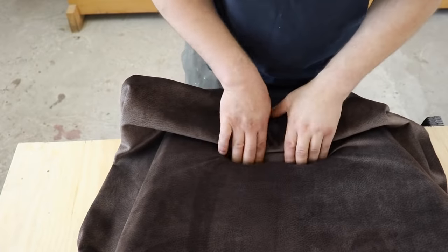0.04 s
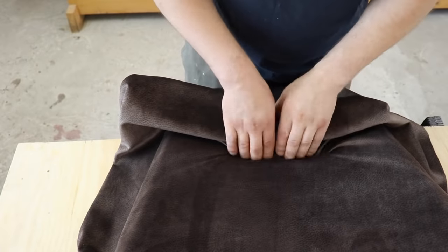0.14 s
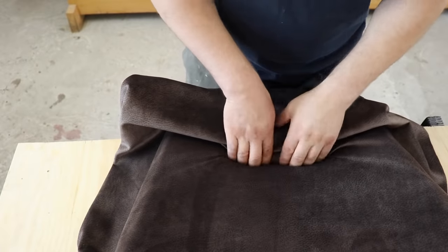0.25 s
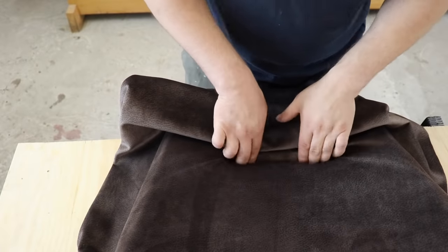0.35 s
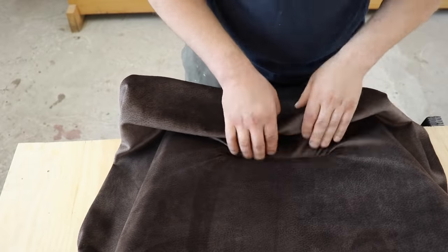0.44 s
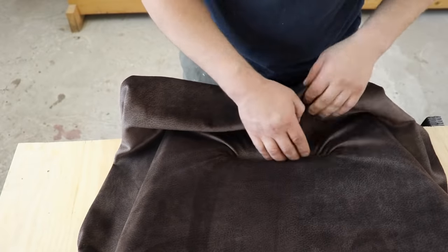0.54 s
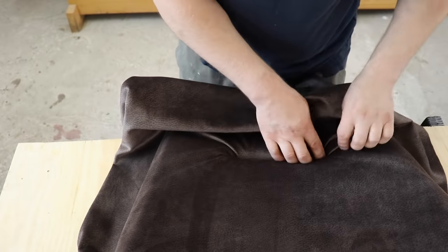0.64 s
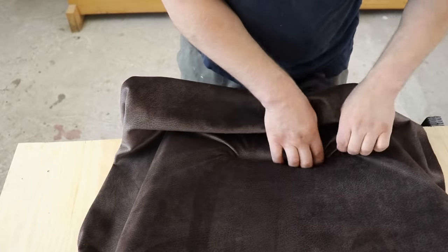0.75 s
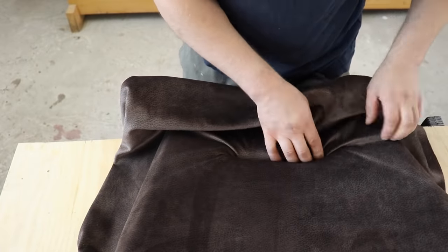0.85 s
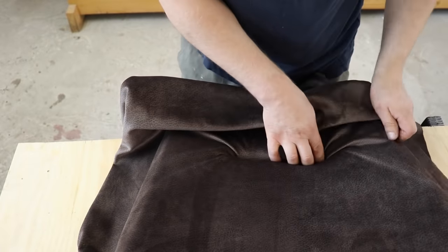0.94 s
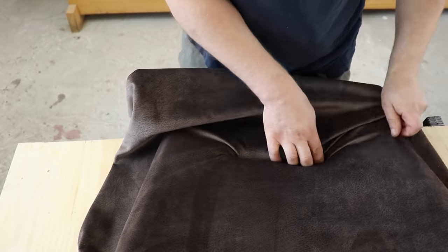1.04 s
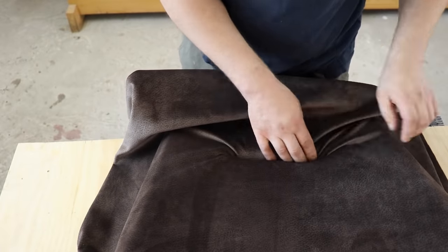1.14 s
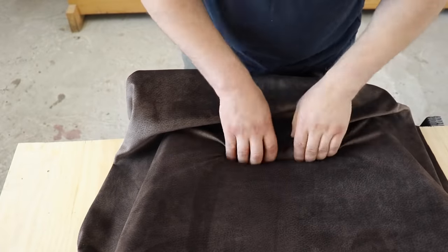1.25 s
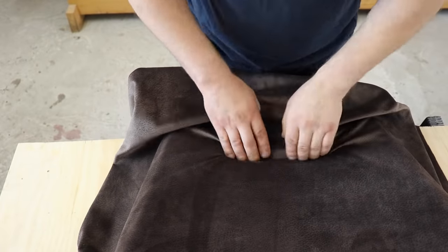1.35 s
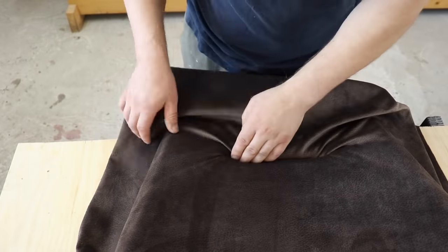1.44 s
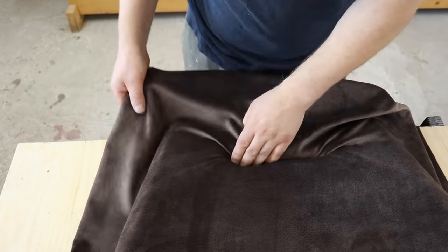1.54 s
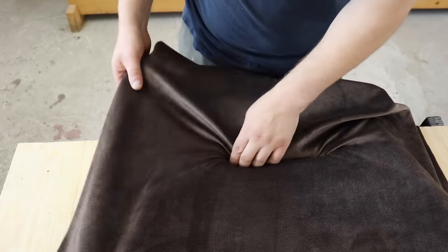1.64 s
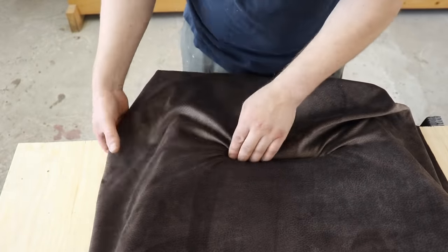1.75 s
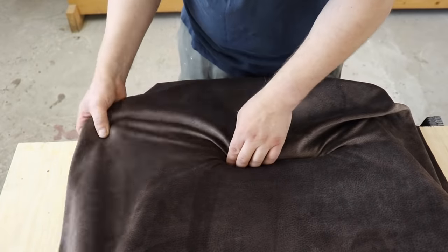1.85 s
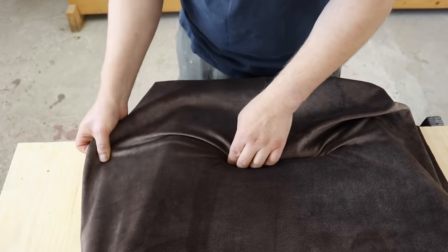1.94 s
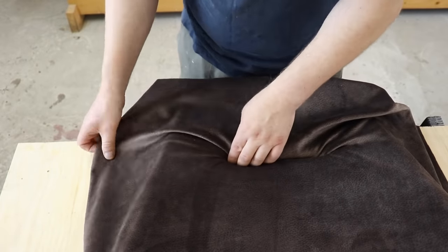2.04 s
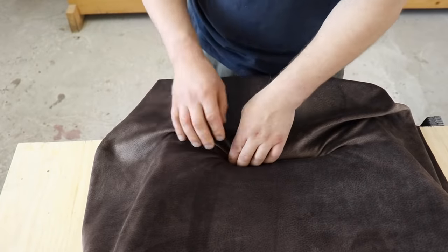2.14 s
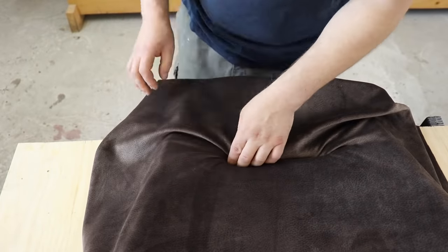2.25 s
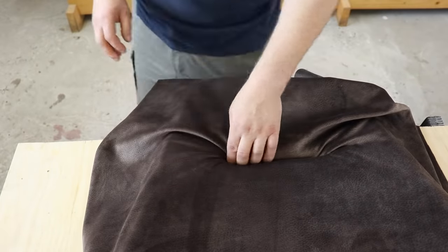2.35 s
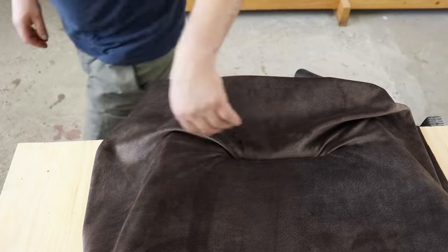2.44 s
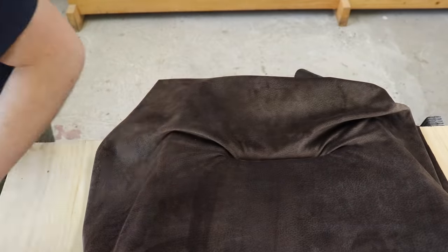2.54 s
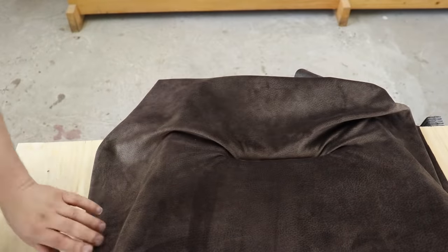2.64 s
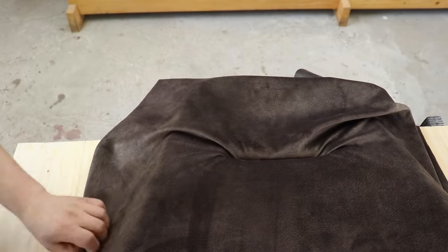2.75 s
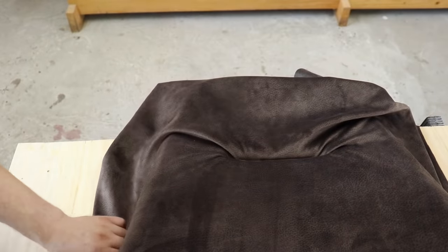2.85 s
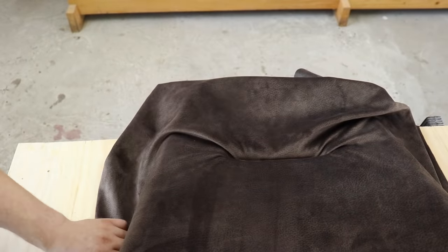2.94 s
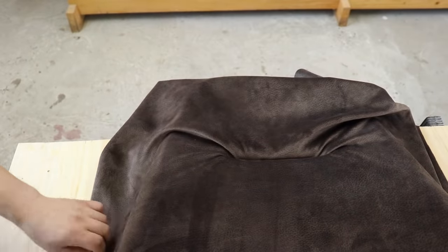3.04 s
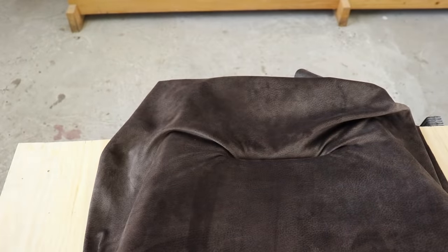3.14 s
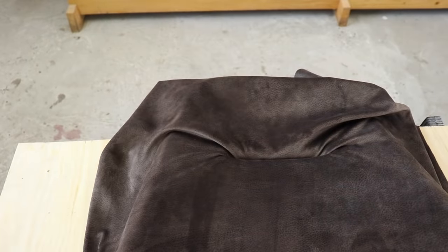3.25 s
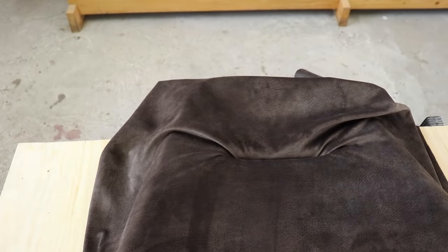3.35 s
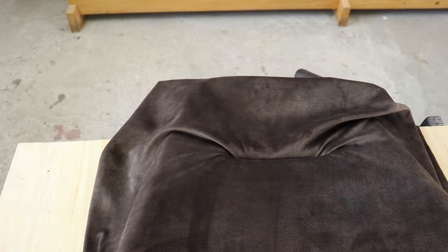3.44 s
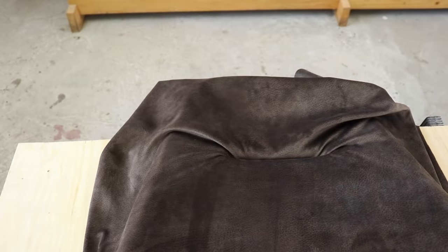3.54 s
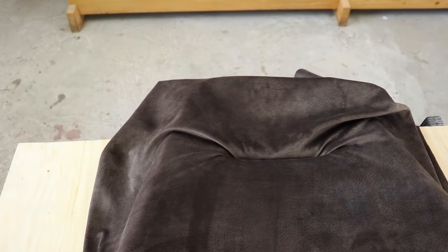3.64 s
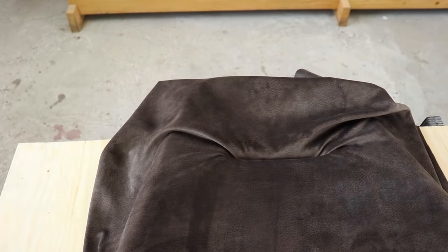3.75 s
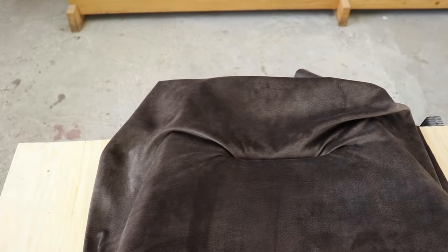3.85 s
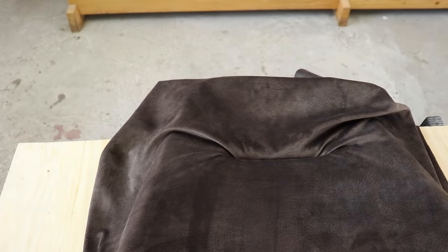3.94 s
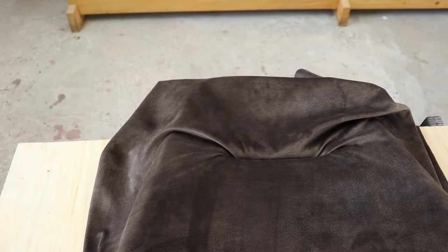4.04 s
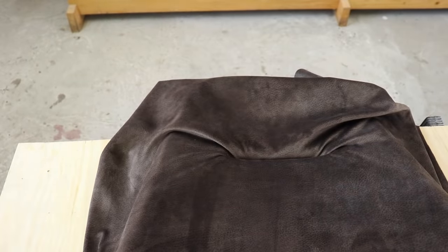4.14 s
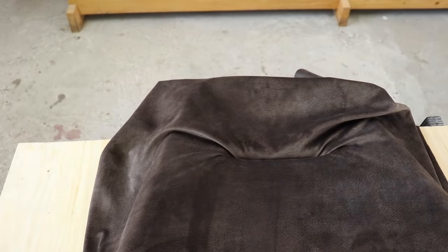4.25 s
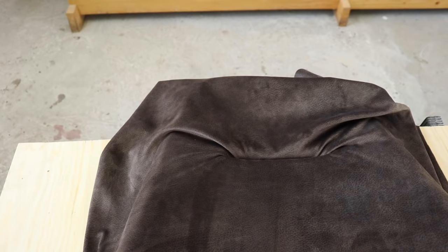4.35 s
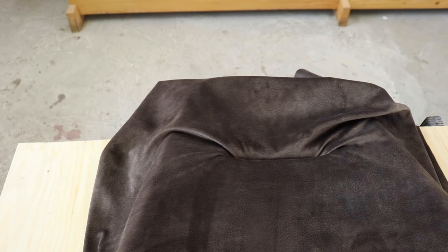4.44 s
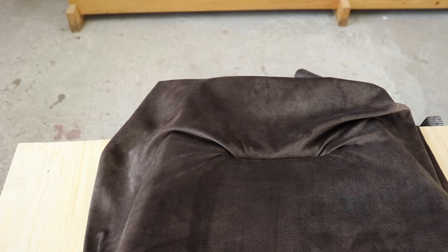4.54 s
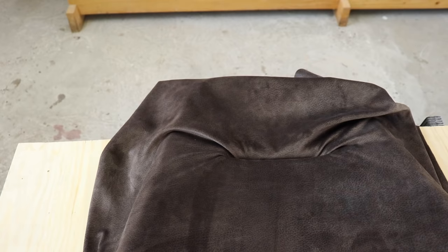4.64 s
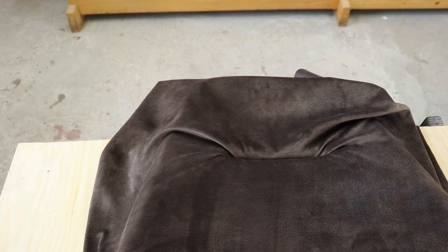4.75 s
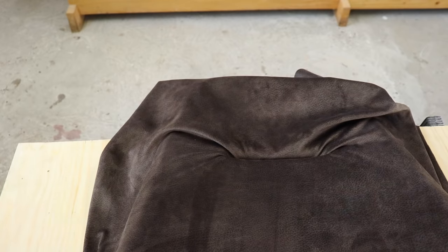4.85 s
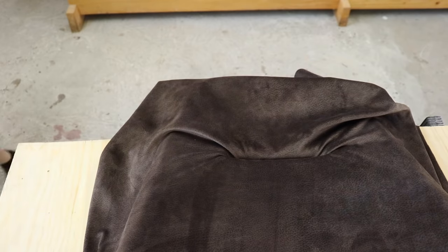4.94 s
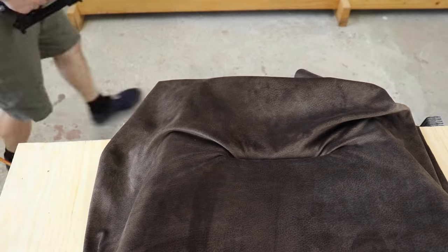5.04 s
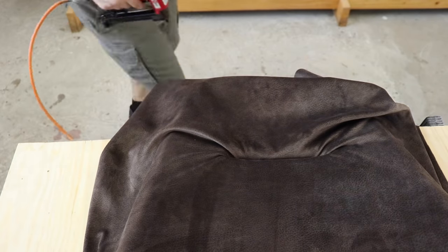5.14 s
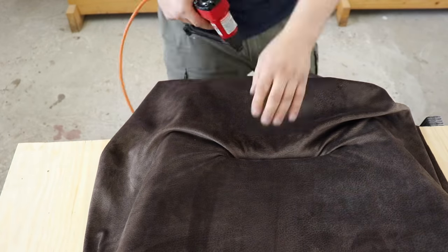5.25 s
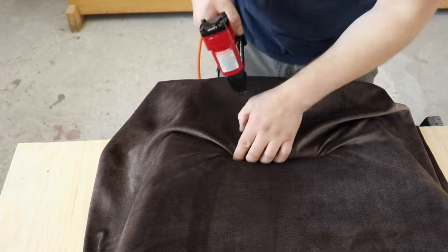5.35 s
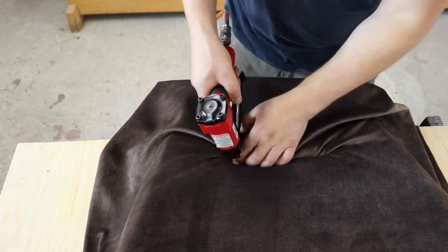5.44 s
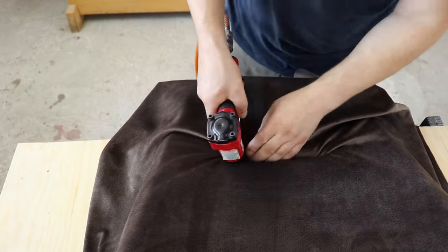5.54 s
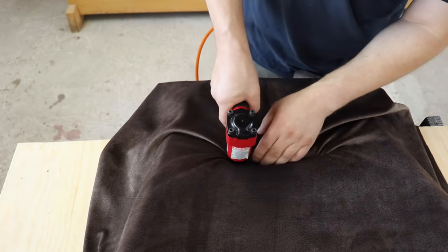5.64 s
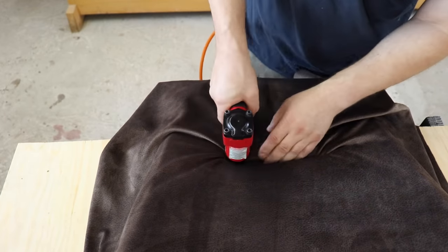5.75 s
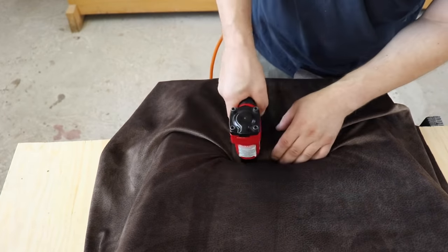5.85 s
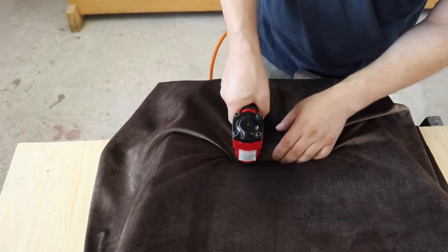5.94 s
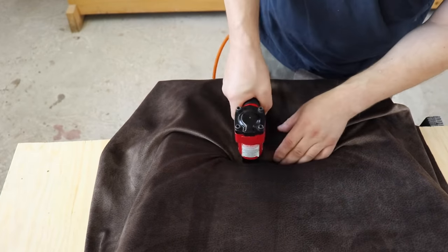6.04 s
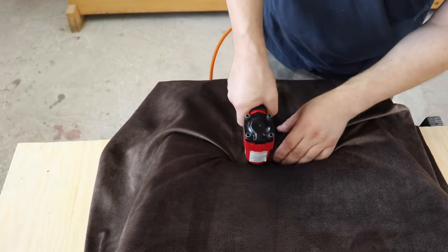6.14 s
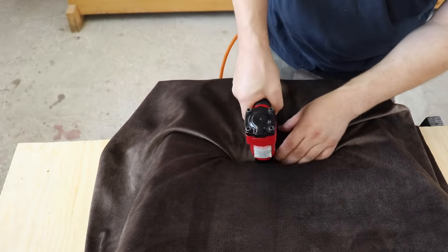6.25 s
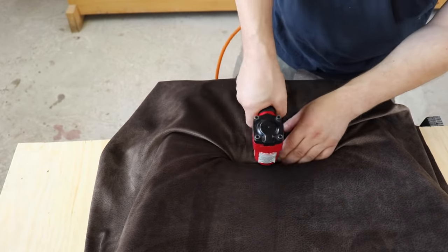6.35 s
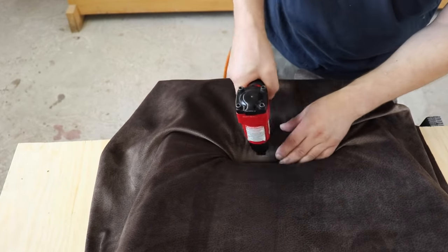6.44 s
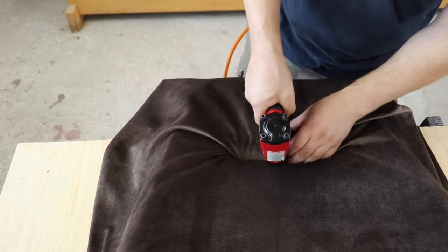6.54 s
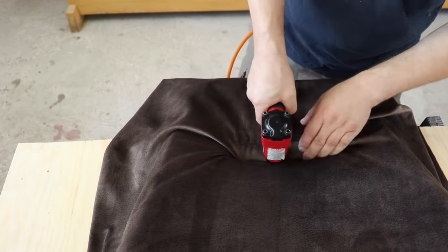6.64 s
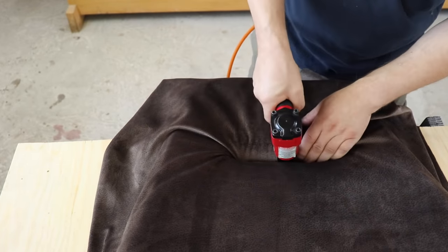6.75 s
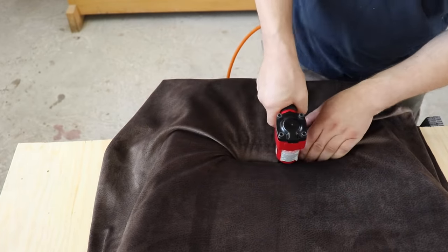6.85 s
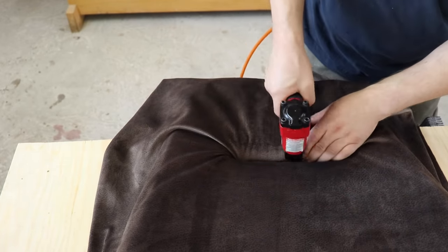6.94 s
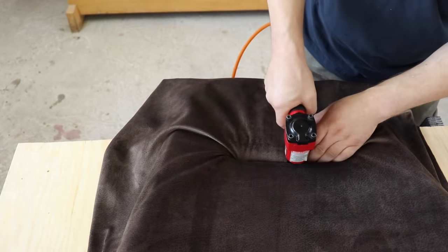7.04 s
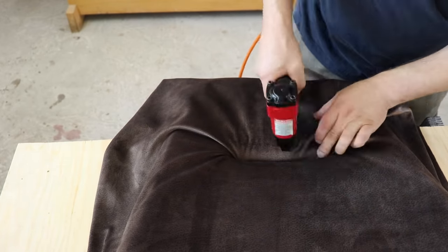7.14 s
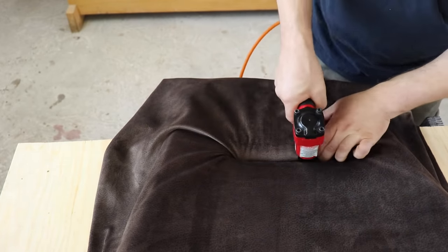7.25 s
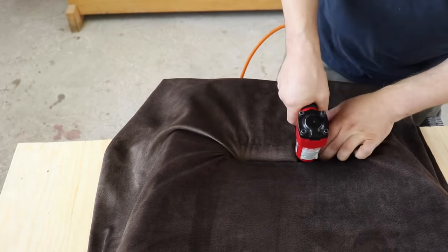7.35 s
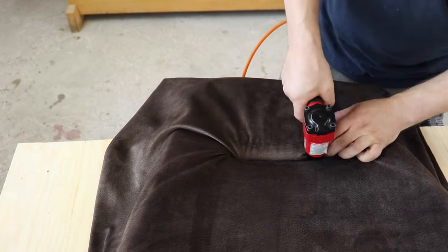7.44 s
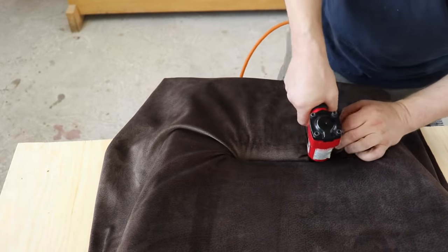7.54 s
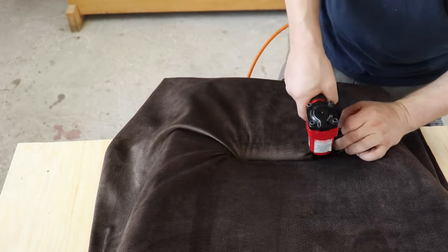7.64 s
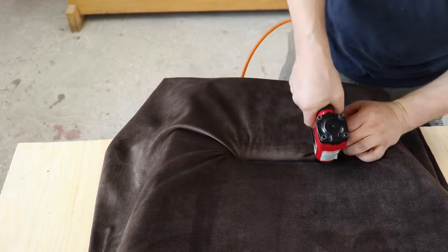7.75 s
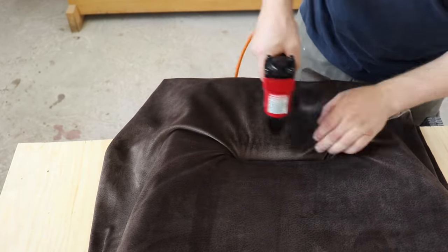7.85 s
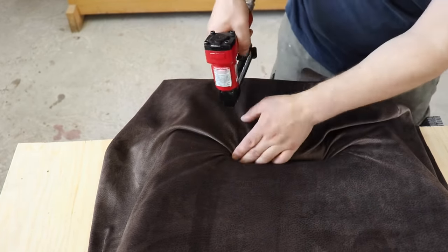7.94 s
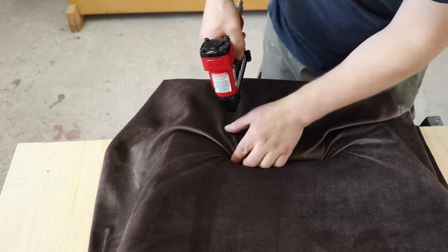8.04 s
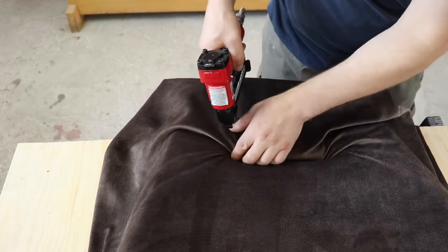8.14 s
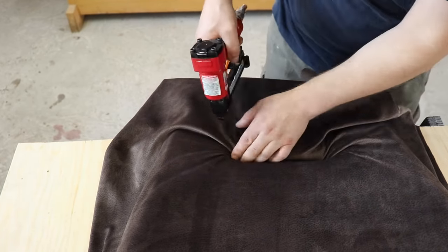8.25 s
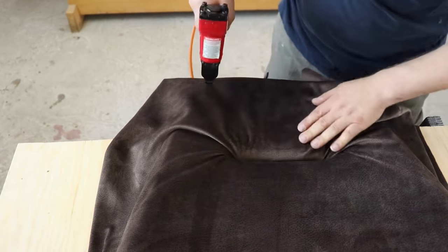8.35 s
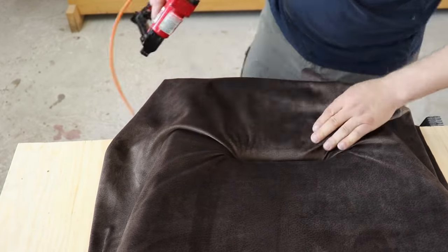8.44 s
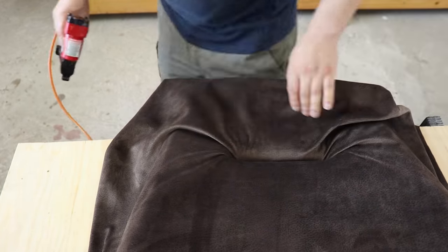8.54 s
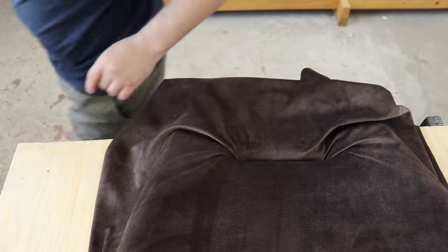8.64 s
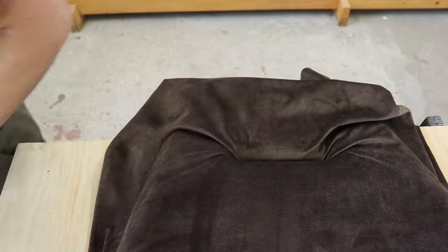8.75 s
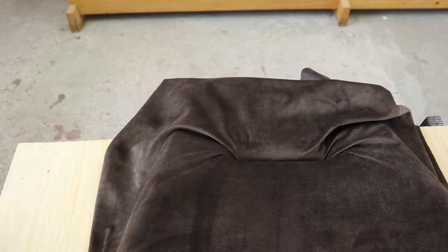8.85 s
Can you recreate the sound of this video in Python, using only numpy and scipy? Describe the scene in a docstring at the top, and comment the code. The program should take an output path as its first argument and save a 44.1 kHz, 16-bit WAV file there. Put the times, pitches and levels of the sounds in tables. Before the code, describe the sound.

Soft fabric handling and a hard double clank over a steady machine hum, followed by a brisk, overloaded run of ten pneumatic staple shots.

```python
"""An air stapler fires ten staples through cloth into plywood in a hard-walled workshop.
Each shot is direct ringing of nose, piston and board, with bands of noise for air, valve and room.
Before and after the shots, cloth rustles and things are handled: short noise rubs, clicks and wood knocks.
A far machine drones throughout as shaped noise, narrow whistles and thin tones.
The stereo recorder overloads on the blows, and its late limiter lets go at a steady rate."""
import sys
import numpy as np
from scipy import signal
from scipy.io import wavfile

SR = 44100
rng = np.random.default_rng(int(sys.argv[2]) if len(sys.argv) > 2 else 0)


def inscribe(sig):
    """Save sig as 16-bit PCM at rate SR to the path in sys.argv[1].

    A 1-D sig is mono; a 2-D sig holds one channel per row.
    Samples are clipped to [-1, 1] before scaling.
    """
    pcm = np.round(np.clip(np.atleast_2d(sig).T, -1, 1) * 32767)
    wavfile.write(sys.argv[1], SR, pcm.astype(np.int16))


N = 392490
STEP = 8   # samples between the points of a power envelope
CUTOFF_HZ = 15900   # top of the recorder's range
DRONE_DB = -43   # relative level of the drone's noise
LEFT_DB = 2   # band noise (but the clank's), thin tones and squeaks are this much louder on the left
VALVE_LEAD_S = 0.00579   # the valve opens this long before the driver lands
RUB_S, BELOW_DB_PER_OCT, ABOVE_DB_PER_OCT = 0.0065, 6, 5   # rub length; fall either side of its strongest pitch
TICK_DB, TICK_T60_S = -10.5, 0.012   # a crack also rings briefly at its strongest pitch
SWELL_S = 0.00071   # time constant of the rounded start of room sound
LEAN_DB = LEFT_DB / 2 * np.array([[1], [-1]])   # left row, right row

# All table levels are relative; the functions add each source's offset.
# Far machine, broad noise. Each row: pitch in Hz, level in dB per Hz.
DRONE_SPECTRUM = [(24, -86), (40, -48), (223, -7.5), (435, -20), (467, -3), (566, -13), (956, -5.5),
                  (1100, -6), (1430, -2), (1660, -3), (2310, -3.5), (3150, -7.5), (12000, -22.5),
                  (15600, -58), (22000, -120)]
# Far machine, narrow whistles. Each row: pitch in Hz, width in Hz, level in dB.
DRONE_WHISTLES = [(660, 31, -8.5), (979.5, 35, -3), (1426, 20, -3), (1797, 29, -1), (1992, 27, 0.5),
                  (2221, 29, 0.5), (3344, 38, -6.5), (3770, 23, -18.5), (3965, 6.5, -0.5),
                  (4390, 59, -10.5), (5070, 110, -18.5), (6370, 17, -14)]
# Far machine, thin tones. Each row: pitch in Hz, level in dB rms.
DRONE_TONES = [(958.2, -66.5), (1389, -64.5), (1798, -64), (1970, -77.5), (2256, -65.5), (2390, -75),
               (3774, -70), (3930, -67), (4587, -76), (4748, -75.5), (5254, -83.5), (6347, -72)]
# Cloth and sleeves rustling. Each row: time in seconds, level in dB.
RUSTLE_LEVEL = [(0.0, -55), (0.32, -63), (1.05, -64), (1.3, -60.5), (2.41, -63), (2.75, -52), (2.9, -69),
                (3.33, -55.5), (4.0, -63), (4.33, -56.5), (4.64, -48), (4.8, -43.5), (5.09, -54.5),
                (5.47, -51), (5.78, -82), (8.05, -61), (8.39, -59), (8.9, -53.5)]
# Colour of the cloth. Each row: pitch in Hz, level in dB per Hz.
RUSTLE_SPECTRUM = [(300, -18), (2000, -2), (4500, -2), (7500, 1.5), (11000, -7), (16000, -2)]
# Faint squeaks and whines. Each row: start in seconds, length in seconds, pitch in Hz, level in dB.
SQUEAKS = [(0.185, 0.059, 2890, -52), (1.701, 0.063, 3880, -54), (3.287, 0.078, 3750, -51),
           (3.302, .06, 4950, -60), (3.471, 0.041, 6530, -48.5), (3.64, 0.079, 2470, -50.5),
           (4.239, 0.044, 2540, -48), (4.529, 0.028, 2550, -47.5), (8.0, .85, 1203, -57)]
# Scuffs, cloth snaps and small bumps. Each row: start in seconds, level in dB at the strongest pitch,
# that pitch in octaves above 1 kHz, first crack in dB relative to that level.
HANDLING = [(1.61, -42.5, 3.4, 3), (1.719, -44, 1.6, 1), (2.151, -42, 1.9, 1), (2.325, -49.5, 3.3, 4),
            (2.589, -45, 3.1, 0), (2.715, -33.5, 2.84, 1.5), (2.789, -41.5, 3.4, -1),
            (2.886, -37.5, 2.83, 5.5), (3.127, -49, 2.8, 3), (3.201, -44, 2.3, 2), (3.473, -41, 1.9, -2),
            (3.584, -33, 1.57, -8), (3.718, -35.5, 1, -7), (3.843, -35, 1.1, -8), (4.184, -38.5, 2.7, -7),
            (4.226, -33.5, 3.4, 5.5), (4.269, -40.5, 3.3, 0), (4.341, -22.5, 3.88, 2),
            (4.498, -40, 1.1, -6), (4.605, -37.5, 1.86, -1), (4.95, -36, 2.7, -5), (5.035, -37.5, 2.4, 2),
            (5.051, -39.5, 2.8, 12), (5.1297, -40.5, 1, 15.5), (5.261, -33, 1.5, 0), (5.297, -45, 2.6, 10),
            (5.316, -44.5, 2.8, 13), (5.37, -25.5, 1.03, 2), (5.448, -44, 3.1, -1),
            (8.0927, -49, 0.97, 10.5), (8.427, -36.5, 2.05, -2), (8.526, -49, 3, 3),
            (8.584, -45.5, 2.1, 4.5), (8.873, -37.5, 1.04, 4.5)]
# Slight bass trim of the small sounds. Each row: pitch in Hz, change in dB.
RUB_BASS = [(120, -1), (670, -0.5)]
# Hollow knocks on wood. Each row: start in seconds, peak level in dB, base pitch in Hz.
KNOCKS = [(1.644, -51, 620), (1.894, -50, 680), (2.177, -51, 654), (5.131, -40.5, 475), (5.375, -29.5, 655),
          (7.392, -47, 407), (8.095, -42.5, 900), (8.433, -41.5, 880)]
# Overtones of every wood knock. Each row: multiple of the base pitch, level in dB, t60 in seconds.
WOOD_OVERTONES = [(1.0, 1.5, .07), (1.17, -3, .05), (2.25, 0, 0.051), (3.4, -15, 0.042), (4.8, -42, 0.016)]
# Tool knocked against the bench. Each row: start in seconds, level in dB, brightness in dB, which
# shifts the noise's treble (from 3.5 kHz, full at 6 kHz) and all the steel ringing.
CLANKS = [(3.989, -16, -14), (4.003, -14, 2)]
# Colour of the clank's noise. Each row: pitch in Hz, level in dB per Hz.
CLANK_SPECTRUM = [(59, -78), (153, -79), (380, -47), (662, -25), (1330, -16), (1870, -14), (2580, -7),
                  (3620, -1), (4470, -16.5), (7770, -5), (16000, -13.5)]
# Steel ringing in the clank. Each row: pitch in Hz, width in Hz, level in dB.
CLANK_STEEL = [(433, 19, -17.5), (675, 26, -7), (902, 28, -6.5), (1670, 23, 3), (1878, 26, 6),
               (2180, 25, 7.5), (2370, 90, -5.5), (3620, 38, 5.5), (5560, 180, 2), (6460, 31, 3),
               (6860, 40, 0), (7350, 22, 7), (7710, 78, -5), (7870, 60, 1.5), (9600, 45, 4), (10000, 30, 2)]
# The ten shots. Each row: driver landing in seconds, wait for the piston's return in seconds,
# then blow, valve, return and board boom in dB.
SHOTS = [(5.8081, 0.023, 7, -18, 18, 13), (6.0524, 0.029, 8, -24.5, 9, 1.5),
         (6.2484, 0.032, 9, -16.5, 10.5, -14), (6.4575, 0.032, 11, -16.5, 8.5, 3),
         (6.7031, 0.026, 11.5, -20.5, 5, -17), (6.9513, 0.027, 11, -18.5, 5.5, -4),
         (7.1773, .029, 11, -17.5, 9.5, -14), (7.4359, 0.029, 10.5, -18, 7, -12.5),
         (7.6461, .0302, 10, -12, 5, -24), (7.8638, 0.026, 10, -12, -0.5, -10.5)]
# Air and room tail of a blow. Each row: pitch in Hz, level in dB per Hz.
BLOW_SPECTRUM = [(59, -65), (100, -47), (424, -41), (535, -44.5), (634, -36.5), (836, -20.5), (950, -18),
                 (2630, -0.5), (3050, -13.5), (3540, -10), (4870, -4), (14100, -8.5), (16000, 4)]
# Blow, return and valve heard directly. Each row: pitch in Hz, level in dB per Hz.
CRACK_SPECTRUM = [(150, -48), (600, -22), (2000, -0.5), (6000, -4.5), (16000, -5.5)]
# Board and tool steel as heard in the room. Each row: pitch in Hz, width in Hz, level in dB.
SHOT_STEEL = [(438, 21.5, -24), (666, 45, -15), (953, 13, -7), (1083, 27, -5), (1796, 20, -3.5),
              (2290, 450, -13.5), (3010, 280, 0), (3130, 120, -5.5), (3107, 98, -5), (4755, 160, -5.5),
              (4740, 150, 0.5), (5300, 480, -4), (5450, 190, -20.5), (7200, 1400, -15.5),
              (10250, 320, -5.5)]
# Struck nose, heard directly. Each row: pitch in Hz, level in dB, t60 in seconds.
NOSE = [(1480, 1.5, 0.0062), (2112, 3.5, 0.0058), (3110, -2.5, 0.0048), (5800, -10, 0.008),
        (7340, -9, 0.0027), (10430, -4.5, 0.0054), (14600, -14.5, 0.0052)]
# Plywood, heard directly. Each row: pitch in Hz, level in dB, t60 in seconds.
BOARD = [(457, -9.5, 0.016), (648, -4, 0.016), (1026, -2, 0.0075), (1205, -14, 0.0047)]
# Piston slapping the head. Each row: pitch in Hz, level in dB, t60 in seconds.
PISTON = [(1270, 3.5, 0.0034), (4010, -0.5, 0.0028), (7900, 2, 0.0044)]
# Trigger snapping back. Each row: start in seconds, peak level in dB.
RELEASES = [(5.9584, -27), (6.65, -22.5), (6.8768, -28), (7.3811, -28.5)]
# Ringing of the trigger. Each row: pitch in Hz, level in dB, t60 in seconds.
TRIGGER = [(7300, -8, .008), (8500, -3, .011), (10300, -11, .007), (12300, -13, .006), (14500, -10, .006)]
# Workshop reverberation before a source's own factor. Each row: pitch in Hz, t60 in seconds.
ROOM_T60 = [(300, 0.32), (800, 0.18), (2000, 0.18), (6000, .2), (15000, 0.18)]
# How alike the two microphone ports hear a pitch. Each row: pitch in Hz, likeness from 0 to 1.
LIKENESS = [(100, 0.91), (600, 0.83), (1400, 0.97), (3100, 0.65), (6800, 0.17), (15000, 0)]


def from_db(db):
    """dB to gain; twice the dB gives power."""
    return 10 ** (np.asarray(db) / 20)


def at_hz(points, hz):
    """Reads a spectrum on a log-frequency axis."""
    pitches, values = np.transpose(points)
    return np.interp(np.log(hz), np.log(pitches), values)


def drift(rate_hz):
    """Slow chance of spread 1, on the envelope grid: noise through two equal low-pass poles."""
    spacing, warm_up = 40, 2000
    r = np.exp(-2 * np.pi * rate_hz * spacing / SR)
    white = rng.standard_normal(N // spacing + warm_up + 2)
    slow = signal.lfilter([1], [1, -2 * r, r * r], white)[warm_up:]
    grid = np.arange(N // STEP + 1) * STEP / spacing
    return np.interp(grid, np.arange(len(slow)), slow / slow.std())


def marks(times, gains, step=STEP):
    """Clicks at the given times, on a floor too faint to hear."""
    out = np.full(N // step + 1, 1e-18)
    np.add.at(out, np.round(np.asarray(times) * SR / step).astype(int), gains)
    return out


def fade(power, t60):
    """Each click leaves a power that dies 60 dB in t60."""
    return signal.lfilter([1], [1, -from_db(-120 * STEP / (t60 * SR))], power)


def swell(power):
    """Rounds off the start of a power envelope with three equal low-pass poles."""
    r = np.exp(-STEP / (SWELL_S * SR))
    return signal.lfilter([(1 - r) ** 3], np.poly([r, r, r]), power)


def gain(power):
    """A power envelope as a gain for every sample."""
    return np.repeat(np.sqrt(power), STEP, axis=-1)[..., :N]


def stereo(mid, side, hz):
    """Two noises become left and right, as alike as the two ports hear that pitch."""
    alike = np.clip(at_hz(LIKENESS, hz), -1, 1)
    return np.sqrt(1 + alike) * mid + np.sqrt(1 - alike) * side * [[1], [-1]]


def resonance(white, hz, width_hz):
    """Stereo noise through one narrow two-pole resonance."""
    r = np.exp(-np.pi * width_hz / SR)
    poles = [1, -2 * r * np.cos(2 * np.pi * hz / SR), r * r]
    mid, side = signal.lfilter([1 - r, 0, r - 1], poles, white)
    return stereo(mid, side, hz)


def steel_in_room(peaks, times, levels_db, sustain):
    """Noise in narrow resonances, swelling and dying with the room after each blow."""
    out, white = 0, rng.standard_normal((2, 2, N))
    luck_db = rng.normal(0, 1.8, (len(times), len(peaks)))   # each blow favours other resonances
    for k, (hz, width_hz, db) in enumerate(peaks):
        blows = marks(times, from_db(2 * (levels_db + luck_db[:, k])))
        power = swell(fade(blows, sustain * at_hz(ROOM_T60, hz)))
        out = out + from_db(db) * gain(power) * resonance(white[k % 2], hz, width_hz)
    return out


def ring(clicks, hz, t60):
    """A unit click sets a decaying sine of starting height 1 ringing."""
    r, w = from_db(-60 / (t60 * SR)), 2 * np.pi * hz / SR
    return signal.lfilter([0, np.sin(w)], [1, -2 * r * np.cos(w), r * r], clicks)[:N]


def struck(modes, times, levels_db):
    """Every blow rings every mode with its own strength; neighbouring modes start in opposite sense."""
    out, luck_db = 0, rng.normal(0, 1.9, (len(times), len(modes)))
    for k, (hz, db, t60) in enumerate(modes):
        clicks = marks(times, from_db(levels_db + db + luck_db[:, k]), 1)
        out = out + (-1) ** k * ring(clicks, hz, t60)
    return out


def drone_power(hz, together):
    """Far machine in one band: a steady spectrum, wavering a little as a whole and more band by band."""
    wander_db = 0.4 * together + 2.3 * drift(12.0)
    return from_db(2 * (DRONE_DB + at_hz(DRONE_SPECTRUM, hz) + wander_db))


def drone_whistles():
    """Far machine: noise in narrow resonances, each slowly wavering."""
    out, white = 0, rng.standard_normal((2, 2, N))
    for k, (hz, width_hz, db) in enumerate(DRONE_WHISTLES):
        power = from_db(2 * (-40.0 + 1.3 * drift(1.5)))
        out = out + from_db(db) * gain(power) * resonance(white[k % 2], hz, width_hz)
    return out


def drone_tones():
    """Far machine: thin sines of steady pitch and slowly wavering level."""
    t, out = np.arange(N) / SR, np.zeros(N)
    for hz, db in DRONE_TONES:
        level = gain(from_db(2 * (db + 2.25 * drift(2.5))))
        out += np.sqrt(2) * level * np.sin(2 * np.pi * (hz * t + rng.random()))
    return out * from_db(LEAN_DB)


def rustle_level_db():
    """Cloth and sleeves: the level moves from point to point, roughened by quick chance."""
    t = np.arange(N // STEP + 1) * STEP / SR
    return np.interp(t, *np.transpose(RUSTLE_LEVEL)) + 2.6 * drift(30.0)


def squeaks():
    """Short sines that swell and fade, their phase wandering at random."""
    out = np.zeros(N)
    for start_s, length_s, hz, db in SQUEAKS:
        i, n = round(start_s * SR), round(length_s * SR)
        phase = 2 * np.pi * hz * np.arange(n) / SR + np.cumsum(rng.normal(0, 0.047, n))
        out[i:i + n] += from_db(db + 1) * np.sqrt(np.hanning(n)) * np.sin(phase)
    return out * from_db(LEAN_DB)


def handling_power(hz):
    """Small sounds in one band: a crack, a short rub, then the room."""
    start_s, peak_db, octaves, crack_db = np.transpose(HANDLING)
    off = np.log2(hz / 1000) - octaves
    slope_db = BELOW_DB_PER_OCT * np.minimum(off, 0) - ABOVE_DB_PER_OCT * np.maximum(off, 0)
    db = peak_db + slope_db + at_hz(RUB_BASS, hz)
    points = round(RUB_S * SR / STEP)
    rub = signal.lfilter(np.ones(points) / points, [1], marks(start_s, from_db(2 * db)))
    crack = fade(marks(start_s, from_db(2 * (db + crack_db))), 0.059)
    return fade(rub, 1.22 * at_hz(ROOM_T60, hz)) + crack


def knocks_and_ticks():
    """Wood knocks ring one shared set of overtones; every handling crack leaves a dry tick."""
    parts = []
    for start_s, db, hz in KNOCKS:
        for multiple, part_db, t60 in WOOD_OVERTONES:
            parts.append((start_s, db + part_db, hz * multiple, t60))
    for start_s, db, octaves, crack_db in HANDLING:
        parts.append((start_s, db + crack_db + TICK_DB, 1000 * 2 ** octaves, TICK_T60_S))
    out, click = np.zeros(N + SR), np.zeros(SR // 4)
    click[0] = 1
    for start_s, db, hz, t60 in parts:
        i = round(start_s * SR)
        out[i:i + len(click)] += from_db(db) * ring(click, min(hz, CUTOFF_HZ), t60)
    return out[:N]


def clank_power(hz):
    """Room tail, in one band, of the tool knocking twice on the bench."""
    start_s, db, bright_db = np.transpose(CLANKS)
    treble_share = at_hz([(3500, 0), (6000, 1)], hz)
    level_db = db + bright_db * treble_share + 4.5 + at_hz(CLANK_SPECTRUM, hz)
    return swell(fade(marks(start_s, from_db(2 * level_db)), at_hz(ROOM_T60, hz)))


def clank_steel():
    """The knocked tool's steel, ringing on in the room."""
    start_s, db, bright_db = np.transpose(CLANKS)
    return steel_in_room(CLANK_STEEL, start_s, db + bright_db + 10.0, sustain=0.94)


def shots():
    """Times of landing, valve and return in seconds, then the four relative levels in dB."""
    land, wait, *levels_db = np.transpose(SHOTS)
    return land, land - VALVE_LEAD_S, land + wait, *levels_db


def shot_power(hz):
    """Shots in one band: room tail, rushing air, short cracks and the valve's puff."""
    land, valve, back, blow_db, valve_db, back_db, _ = shots()
    tail = fade(marks(land + 0.005, from_db(2 * (blow_db + 2))), at_hz(ROOM_T60, hz))
    # air rushes until the piston is back; each return takes off 1 dB more than the blow added,
    # and that debt carries over: the rush thins out and is gone from the seventh shot on
    rush_on = marks(land + 0.0013, from_db(2 * (blow_db + 7)))
    rush_off = marks(back + 0.00085, from_db(2 * (blow_db + 8.0)))
    rush = np.maximum(np.cumsum(rush_on - rush_off), 0)
    cracks = fade(marks(land, from_db(2 * (blow_db - 1.0))), 0.0089)
    cracks += fade(marks(back, from_db(2 * (back_db + 6))), 0.014)
    puff = fade(marks(valve, from_db(2 * (valve_db + 3.0))), 0.0071)
    puff = signal.lfilter([0.2], [1, -0.8], puff)   # softened start
    room_and_air = (tail + rush) * from_db(2 * at_hz(BLOW_SPECTRUM, hz))
    return room_and_air + (cracks + puff) * from_db(2 * at_hz(CRACK_SPECTRUM, hz))


def shot_steel():
    """Board and tool steel ringing on in the room after each blow."""
    land, _, _, blow_db, *_ = shots()
    return steel_in_room(SHOT_STEEL, land + 0.0012, blow_db + 8, sustain=0.89)


def nose_and_piston():
    """Driver ticks on the staple, then bottoms out; later the piston slaps the head."""
    land, _, back, blow_db, _, back_db, _ = shots()
    tick = struck(NOSE[3:], land, blow_db - 3.5)
    bottom = struck(NOSE, land + 0.0007, blow_db + 4.5)
    return tick + bottom + struck(PISTON, back, back_db + 9)


def plywood():
    """The board rings at valve, landing and return, stronger on the right."""
    land, valve, back, _, valve_db, back_db, boom_db = shots()
    board = struck(BOARD, land + 0.00058, boom_db + 2)
    board = board + struck(BOARD, back, back_db - 2.5)
    board = board + struck(BOARD, valve + 0.0002, valve_db)
    return board * from_db([[-4.0], [6.0]])


def trigger():
    """The trigger snaps back with a short bright ring."""
    return struck(TRIGGER, *np.transpose(RELEASES))


def noises():
    """Broad noise in third-octave bands: the powers of the sources add in each band."""
    out, white = 0, rng.standard_normal((2, 2, N))
    edges_hz = 40 * 2 ** np.arange(0, 9, 1 / 3)
    together, rustle_db = drift(1.7), rustle_level_db()
    for k, (low, high) in enumerate(zip(edges_hz, edges_hz[1:])):
        hz = np.sqrt(low * high)
        band_pass = signal.butter(2, [low, high], "band", fs=SR, output="sos")
        band = stereo(*signal.sosfilt(band_pass, white[k % 2]), hz)
        rustle = from_db(2 * (rustle_db + at_hz(RUSTLE_SPECTRUM, hz)))
        power = drone_power(hz, together) + rustle + handling_power(hz) + shot_power(hz)
        clank = clank_power(hz) * from_db([[3.0], [-3.0]])   # power: 1.5 dB up left, down right
        # as a power factor the lean is halved: left and right differ by LEFT_DB / 2 on each side of a power
        out = out + band * gain(from_db(LEAN_DB * 2) * power + clank)
    return out


def scene():
    """The workshop at the microphone: noises, far machine, small sounds, clank and shots."""
    background = noises() + drone_whistles() + drone_tones()
    small = squeaks() + knocks_and_ticks()
    tool = clank_steel() + shot_steel() + nose_and_piston() + plywood() + trigger()
    return background + small + tool


def limiter_cut_db(dry, ceiling_db=-18.0, release_db_s=472.0, lag_s=0.00066, attack_s=0.00099,
                   sense_s=0.00048, linger=0.27, linger_s=0.54):
    """One cut for both channels: reacts late, lets go at a steady rate, and part of it lingers."""
    sense, attack, slow = np.exp(-1 / (np.array([sense_s, attack_s, linger_s]) * SR))
    power = signal.lfilter([1 - sense], [1, -sense], np.mean(dry ** 2, axis=0))
    level_db = 10 * np.log10(power + 1e-12)
    # a running maximum against a rising ramp falls by release_db_s
    ramp = release_db_s * np.arange(N) / SR
    over_db = np.maximum.accumulate(np.maximum(level_db - ceiling_db, 0) + ramp) - ramp
    smooth_db = signal.lfilter([1 - attack], [1, -attack], over_db)
    late_db = np.interp(np.arange(N) - lag_s * SR, np.arange(N), smooth_db)
    return late_db + linger * signal.lfilter([1 - slow], [1, -slow], over_db)


def record(dry, bass_cut_hz=273.0, coupling_hz=225.0, preamp_top_db=12.5, hiss_db=-63.0):
    """Recorder: bass cut, preamp hiss and soft overload, limiter, hard overload, then the cut top."""
    dry = signal.sosfilt(signal.butter(2, bass_cut_hz, "high", fs=SR, output="sos"), dry)
    dry = dry + from_db(hiss_db) * rng.standard_normal(dry.shape)
    dry = from_db(preamp_top_db) * np.tanh(dry / from_db(preamp_top_db))
    clipped = np.clip(dry * from_db(-limiter_cut_db(dry)), -0.9, 0.9)
    output_capacitor = signal.butter(1, coupling_hz, "high", fs=SR, output="sos")
    coupled = signal.sosfilt(output_capacitor, clipped)
    top_cut = signal.cheby2(14, 80, 1.04 * CUTOFF_HZ, fs=SR, output="sos")
    return signal.sosfilt(top_cut, coupled)


dry = scene()
out = record(dry)
inscribe(out)
```